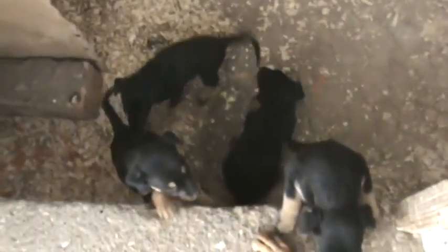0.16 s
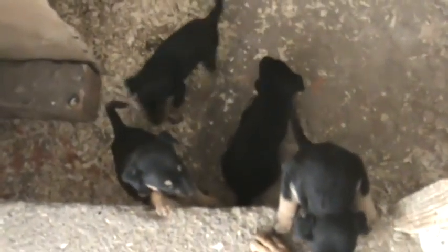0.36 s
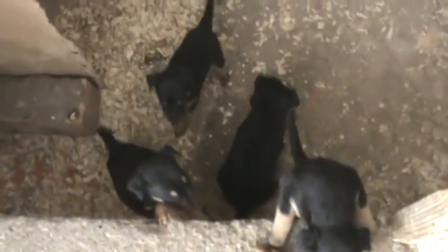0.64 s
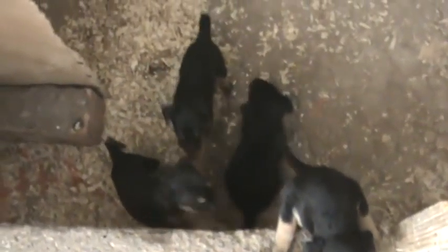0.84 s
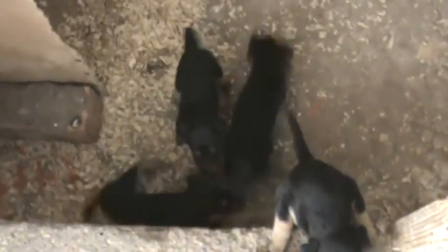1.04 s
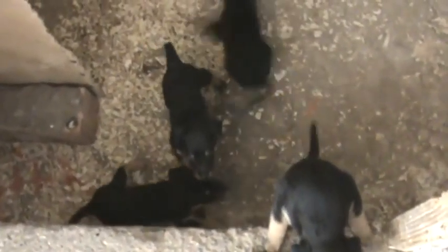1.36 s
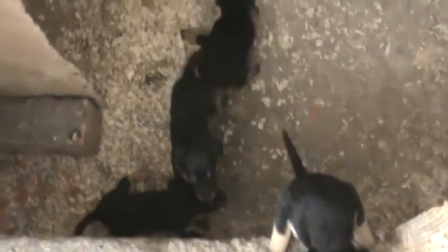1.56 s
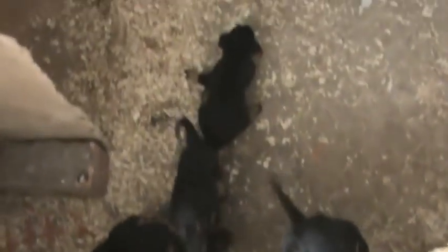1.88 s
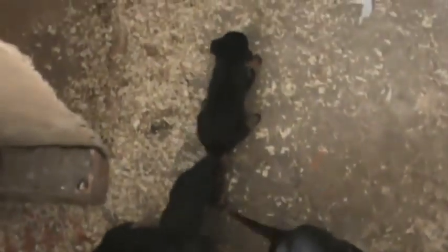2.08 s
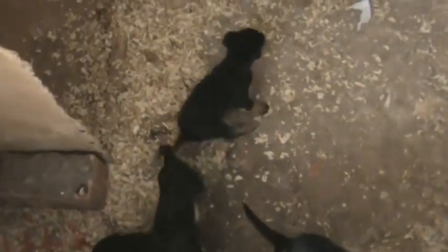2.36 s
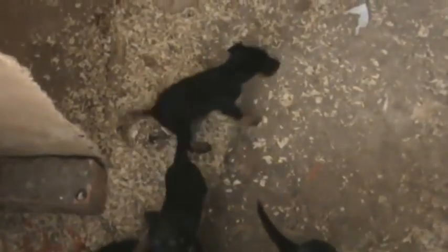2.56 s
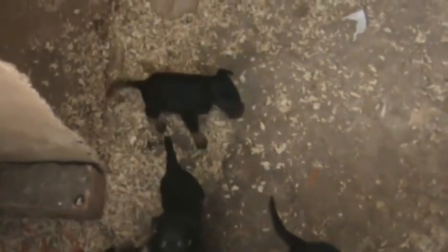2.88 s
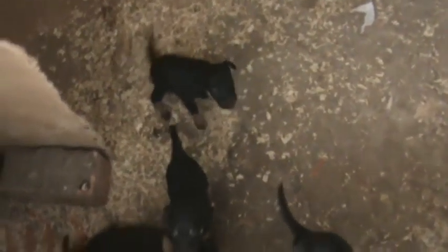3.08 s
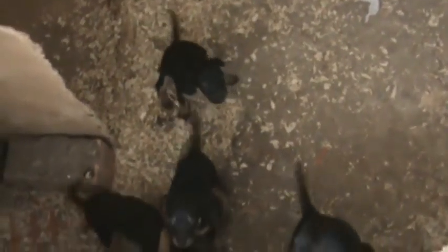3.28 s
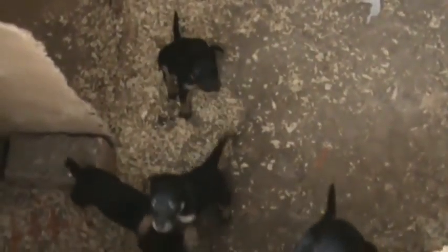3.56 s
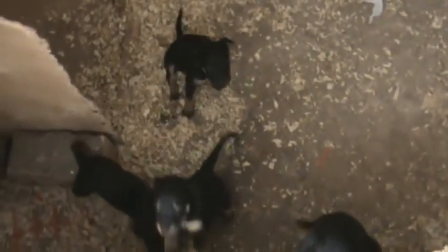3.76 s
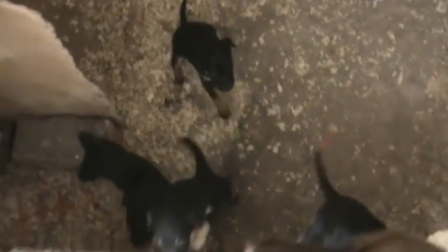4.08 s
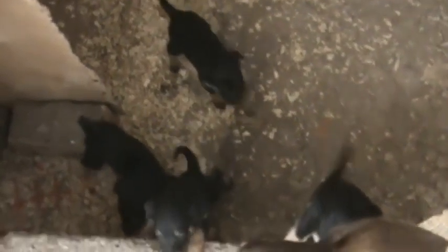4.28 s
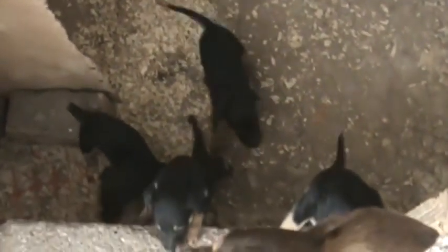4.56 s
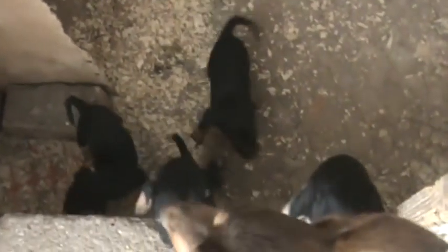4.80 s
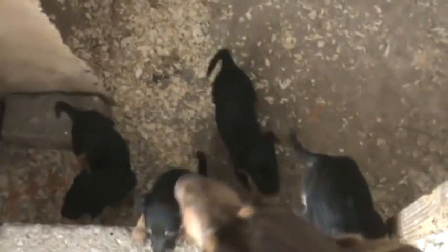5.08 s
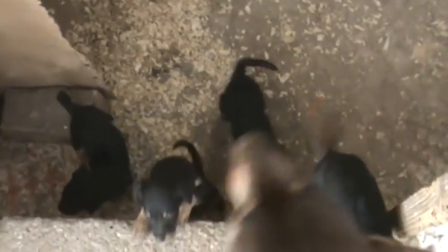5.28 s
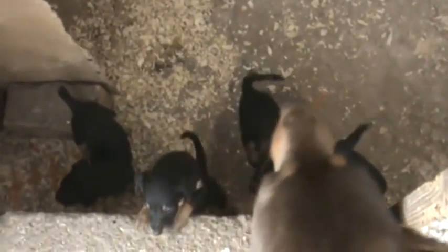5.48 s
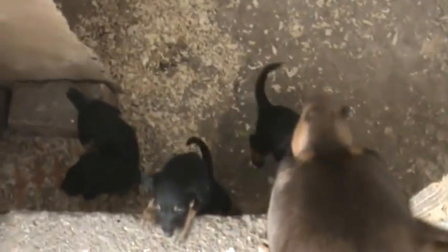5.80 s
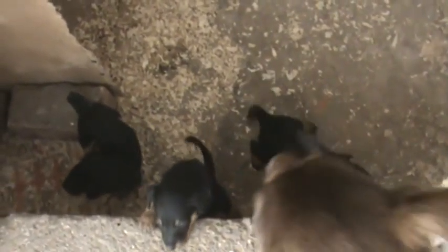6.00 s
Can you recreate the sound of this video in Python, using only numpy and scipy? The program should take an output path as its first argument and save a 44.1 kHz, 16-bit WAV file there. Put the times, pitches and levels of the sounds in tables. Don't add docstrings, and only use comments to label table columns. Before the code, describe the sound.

Close above a hard-walled pen, puppies call over low distant engine rumble, soft hiss and a barely audible thin electronic whine. A small yip opens, a falling yelp follows at 0.2 s, and a short bark at 0.7. From 1.0 to 2.3 s paws slip with brief rubbery squeaks, claws tick, a puff of breath passes, and faint groans, peeps and shavings rustle. At 2.35 s a loud, shrill yelp soars, ending near 2.5. Another cry at 2.7 becomes a piercing, held whine until about 3.0, with claws pattering beneath, then slides down and fades by 3.5. A softer wail rises at 3.7 and sinks to a rough groan around 4.4, where one sharp claw knock stands out. A distant dog moans very faintly. After 4.6 s only sparse light ticks, little grunts, a faint yip and soft breaths remain, to about 6.1 s.

```python
import sys
import numpy as np
from scipy import signal
from scipy.fft import rfft, irfft, next_fast_len
from scipy.io import wavfile
from scipy.ndimage import uniform_filter1d, minimum_filter1d, map_coordinates

SR = 44100
rng = np.random.default_rng(int(sys.argv[2]) if len(sys.argv) > 2 else 0)


def gain_from_db(level_db):
    decades = np.asarray(level_db, float) / 20
    return 10 ** decades


def master(y):
    cut = np.clip(np.atleast_2d(y).T, -1, 1)
    pcm = np.round(cut * 32767)
    wavfile.write(sys.argv[1], SR, pcm.astype(np.int16))


N = 270774
T = np.arange(N) / SR

# time in seconds, pitch in Hz, effort in dB, mouth opening in dB.
YELPS = [
    [(.217, 1114, -36.5, -2.5), (.228, 1144, -45.5, 18.5), (.245, 1329, -33, 12), (.268, 1417, -30.5, 8.5),
     (.29, 1377, -42, 12.5), (.31, 1073, -34, 4), (.34, 976, -33.5, -6), (.4, 911, -40.5, -12.5)],
    [(.708, 557, -38, 2.5), (.718, 544, -47, -1.5), (.725, 808, -28.5, -5.5), (.742, 801, -28.5, -9),
     (.757, 696, -33, -36)],
    [(2.022, 862, -45, -6), (2.045, 892, -43.5, -23), (2.07, 1122, -50.5, -1.5), (2.105, 1130, -48, -9)],
    [(2.35, 1377, -36.5, -1.5), (2.376, 1660, -14.5, -5.5), (2.388, 1738, -15, -10),
     (2.404, 1932, -22.5, 4.5), (2.428, 2116, -19.5, -6.5), (2.443, 2201, -14.5, -13),
     (2.462, 2214, -29, -10.5), (2.492, 2219, -13, -13.5), (2.512, 2205, -42.5, -6)],
]
WHINES = [
    [(2.726, 2020, -39, -8.5), (2.736, 1704, -29.5, -13.5), (2.754, 1657, -13.5, -8.5),
     (2.766, 1700, -18.5, -4.5), (2.786, 1830, -27, 2)],
    [(2.787, 2049, -24, -3), (2.82, 2227, -22.5, -0.5), (2.86, 2065, -11, -25.5), (2.89, 2084, -13, -17.5),
     (2.92, 2102, -13, -21.5), (2.955, 2097, -14.5, -16), (2.99, 2085, -11.5, -21),
     (3.006, 2040, -20, -10.5)],
    [(3.003, 2026, -17.5, -22), (3.025, 1954, -18, -19.5), (3.06, 1917, -25, -15), (3.12, 1871, -21.5, -18),
     (3.25, 1795, -40, 0), (3.3, 1704, -40.5, 3.5), (3.36, 1713, -36.5, -3.5), (3.41, 1597, -37.5, -2.5),
     (3.478, 1588, -41, -3.5)],
]
WAILS = [
    [(3.658, 1124, -45, -32), (3.68, 1304, -34.5, -18.5), (3.71, 1535, -29.5, -7.5),
     (3.745, 1689, -29.5, -12.5), (3.785, 1570, -56.5, -11)],
    [(3.782, 1548, -40.5, -9.5), (3.85, 1434, -40.5, -10.5), (3.96, 1553, -45, -4.5),
     (4.02, 1465, -39.5, -12), (4.12, 1364, -36.5, -15), (4.16, 1405, -40, -15), (4.29, 1342, -40, -12),
     (4.348, 1162, -44, -8.5), (4.41, 1059, -32.5, -25)],
]
GROANS = [
    [(1.355, 318, -47.5, -4), (1.375, 319.5, -46.5, 3), (1.395, 320.8, -41, -1.5),
     (1.418, 326.8, -36, -10.5), (1.455, 309.4, -51, -14.5)],
    [(4.407, 1034, -49, -4), (4.425, 859.7, -43.5, -13), (4.443, 735.5, -40, -8.5),
     (4.456, 846.7, -38, -22), (4.49, 749, -37, -22.5), (4.525, 714, -47, -17)],
]
SECOND_PARTIAL_GAINS = [
    [0, 0, 0, 0, 0, 0, 0, 0],
    [0, 0, 0, 0, 0],
    [0, 0, 0, 0],
    [-5, -2.5, -9, -3.5, 3, 7.5, 5.5, 5, -1.5],
    [9, 4, 2.5, 1.66, 1],
    [1.5, 1.8, 1.5, -1.5, 1.3, -1.5, 1.5, -1.5],
    [1.5, 1.5, -1.5, 1.5, -1.5, -1.46, 2.1, 1.4, 1.3],
    [0, 0, 0, 0, 0],
    [5, -6, 1, -3, -16, 14, 2.5, 3.5, -22],
    [7, 3, -5.5, -11, -8],
    [1.5, 1.3, 2.4, 1.5, 1.5, 1.5],
]
# nasal notch in Hz, mouth top in Hz, second partial in dB,
# its change in dB per dB of opening, roughness 0-1.
THROATS = [(2787, 5600, 13.5, 0.57, 0.08), (3540, 5250, -0.5, 1, 0.1), (3260, 7000, -5, -0.66, .22),
           (2930, 6030, 1.5, 1.16, 0.09), (2782, 6460, 11.5, 2.5, 0.09), (4670, 6250, 11, 1.14, 0.04),
           (4580, 6170, -10.5, 1.1, 0.03), (3135, 6600, 10.5, 1.1, 0.18), (2870, 7100, -12.5, -0.57, 0.05),
           (3060, 3800, 4, -0.3, 0.36), (3210, 3300, 12, 1.33, 0.3)]
# Hz, dB, Hz, dB.
CAVITIES = [(5660, 3.5, 4060, 4), (2360, 6.5, 5500, 0.5), (2680, 9, 4500, -3), (5000, -1, 11000, -14),
            (5000, 0, 6800, 6), (6400, -6, 8400, -2), (5700, -0.5, 7320, -6.5), (4760, -0.5, 6200, 3),
            (4200, -0.5, 8100, -3), (980, 9, 4500, 0), (2340, -12, 3500, 14)]
# start in seconds, length in seconds, first
# pitch in Hz, last pitch in Hz, effort in dB.
YIPS = [(0, 0.067, 946.5, 952, -46), (0.308, .135, 881, 725, -41), (2.09, 0.029, 370, 397, -54.5),
        (2.123, .05, 302.7, 281.6, -47), (2.513, 0.041, 2246, 2256, -31), (2.108, 0.034, 955, 874, -39),
        (2.495, 0.06, 1656, 1592, -30.5), (3.477, 0.023, 1406, 1407, -39.5), (3.568, 0.032, 1154, 890, -56),
        (4.487, 0.038, 481.5, 333, -50), (5.146, 0.024, 600, 640, -69), (5.155, 0.046, 908.5, 984, -51.5)]
# left minus right in dB, mouth opening in dB, second partial in dB, roughness 0-1.
YIP_THROATS = [(2.5, -15, 7.5, 0.6), (2, -22.5, -2, 0.3), (2.5, -15, -8, 0), (1, -11, -4.5, 0.6),
               (-0.5, -28.5, -10.5, 0.1), (-0.5, -22.5, 3.5, 0.3), (2.5, -33.5, -28, 0.4),
               (0, -22, -10, 0.49), (1, -18.5, -5.5, 1), (0, -16, -9, 0.3), (4, -2.5, 7, 0.9),
               (3.5, -20, -9, 0.39)]
# frequency in Hz, level in dB.
MOUTH = [(300, -22), (1000, -11), (2400, -3.5), (4400, -2.5), (5700, -2.5), (7000, 2), (9400, 10),
         (11700, 4.5), (16000, -10)]
# start in seconds, length in seconds, first slip rate in Hz, last rate in Hz, level in dB.
SQUEAKS = [(1.0266, .012, 2510, 2112, -27), (1.039, .05, 1973, 811, -34), (1.219, 0.022, 2890, 1009, -26.5),
           (1.527, 0.019, 1365, 892, -39.5), (1.546, 0.014, 1480, 744.5, -34),
           (1.998, 0.041, 1198, 1292, -48.5), (2.2659, .011, 906, 980, -29.5),
           (2.274, 0.017, 2596, 881, -28.5), (2.559, 0.032, 1244, 502.4, -32.5)]
# skin tone in dB, added unevenness 0-1.
GRIPS = [(-3, 0), (0, 0.5), (-4.5, .05), (-2, 0.07), (1.5, .2), (-2.5, 0), (-9.5, .3), (-23, 0.4), (-9, .5)]
# frequency in Hz, level in dB.
PAD = [(200, -14.5), (900, 7.5), (2500, 2), (4500, -4.5), (7000, -1), (9500, -9.5), (13000, -13),
       (16000, -32.5)]
# start in seconds,
# peak in dB, ring in Hz.
TICKS = [(1.0492, -25, 6400), (1.075, -20, 4340), (1.183, -38, 1450), (1.378, -28, 4270), (1.55, -35, 4860),
         (1.635, -19, 520), (1.997, -16.5, 5000), (2.027, -37, 2180), (2.348, -13, 1830), (2.412, -19, 900),
         (2.696, -24.5, 4200), (2.699, -26, 1000), (2.73, -18, 1900), (2.784, -20.5, 775),
         (2.808, -20, 2800), (2.827, -18.5, 600), (2.846, -23.5, 690), (2.862, -26.5, 600),
         (2.872, -24.5, 900), (2.893, -29, 2900), (2.904, -29, 2900), (3.279, -22, 2600), (3.41, -29, 3800),
         (3.66, -28, 900), (4.4345, -9, 1600), (4.9952, -30, 7500), (5.099, -32.5, 1485), (5.1, -42, 5450),
         (5.263, -36.5, 1700), (5.378, -37.5, 1590), (5.685, -34.5, 1636), (5.742, -40, 1610),
         (5.902, -32, 1590), (5.4077, -34, 3670), (5.626, -34.5, 906), (5.834, -27.5, 900)]
# start in seconds, peak in dB,
# pitch in Hz, overtones in dB.
GRUNTS = [(0.63, -46.5, 264, -22), (0.946, -43, 378, -30), (1.062, -32, 560, -9), (1.084, -33, 298.5, -38),
          (1.545, -40.5, 330, 1.5), (2.572, -39.5, 450, -12.5), (2.866, -47.5, 255, -0.5),
          (4.911, -38, 289, -6), (5.624, -40.5, 244, -6), (5.837, -41, 352, -11.5),
          (6.034, -41.5, 304, -11)]
# start in seconds, length in seconds, level in dB, centre in Hz, width in octaves.
RUSTLES = [(0.529, 0.029, -53, 7020, 0.53), (0.988, 0.037, -61, 4200, 0.15), (1.107, 0.038, -54, 5850, 1.2),
           (1.217, 0.055, -54, 4950, 1.4), (1.494, 0.089, -52.5, 6400, 1.9),
           (1.856, 0.3, -52.5, 5940, 0.67), (2.015, 0.28, -69, 6000, 0.36),
           (3.46, 0.048, -52.5, 6200, 0.57), (4.394, 0.13, -52, 7320, 0.27),
           (4.615, 0.08, -59.5, 5050, 0.98), (5.096, 0.037, -58.5, 7000, 0.65),
           (6.026, 0.086, -66.5, 8100, 0.87)]
# start in seconds, length in seconds, level in dB, centre in Hz, width in octaves.
PANTS = [
    (1.293, 0.18, -42, 6400, 0.86),
    (5.122, 0.24, -63.5, 5000, 0.28),
    (5.865, 0.16, -64, 5620, 0.29),
]
# start in seconds, length in seconds, first pitch in Hz,
# last pitch in Hz, level in dB.
MOANS = [(3.65, 0.41, 495, 504, -74), (3.87, 0.24, 178, 171, -69.5), (3.977, 0.18, 668, 782, -71),
         (3.996, 0.22, 551, 580, -66.5), (4.56, 0.12, 559, 505, -67), (4.72, 0.21, 533, 468, -65.5),
         (1.233, 0.034, 610, 680, -50.5), (1.384, 0.065, 433, 406, -50.5), (1.577, 0.068, 559, 562, -59.5),
         (4.853, 0.063, 1077, 1060, -65), (5.039, 0.032, 1414, 1415, -68)]
# frequency in Hz, time to fall 60 dB in seconds.
WALLS = [(200, 0.26), (800, 0.27), (2000, 0.32), (5000, 0.28), (12000, 0.28)]
# time in seconds, far engine in dB, hiss in dB.
FLOOR = [(0, -61.5, -64.5), (1.55, -68, -63), (1.75, -60, -66), (2.702, -62.5, -58.5), (2.851, -64.5, -74),
         (3.548, -68, -70.5), (3.75, -61, -69.5), (6.14, -62.5, -73)]
# frequency in Hz, level in dB per Hz.
RUMBLE = [(11, -34.5), (18, -4), (49, -8), (62, -7.5), (68, -14.5), (70, -29), (110, -31.5), (140, -55.5),
          (240, -120)]
# frequency in Hz, level in dB per Hz.
HISS = [(41, -32.5), (70, -8.5), (103, -12.5), (487, -13.5), (1060, -16.5), (1180, -19), (1630, -15),
        (2050, -19.5), (2400, -19), (4650, -21), (7020, -22.5), (15200, -32.5), (16300, -54.5)]
# frequency in Hz, left-right likeness.
ALIKE = [(60, 1), (290, 0.64), (900, 0.14), (3100, 0.3), (8000, 0.87), (15000, 0.66)]
# frequency in Hz, radians by which left leads.
PORTS = [(60, -0.081), (300, 0.34), (700, 1.2), (1100, 0.9), (2200, 0.49), (4600, 0.36), (6500, 0.45),
         (9000, -0.025), (13000, 1.2)]


def unit(x):
    return x / np.sqrt(np.mean(x ** 2) + 1e-20)


def along(points, hz):
    f, v = np.transpose(points)
    return np.interp(np.log(np.abs(hz) + 1), np.log(f + 1), v)


def bump(hz, centre_hz, octaves):
    return np.exp(-(np.log2(hz / centre_hz) / octaves) ** 2)


def wobble(n, rate):
    return map_coordinates(rng.standard_normal(int(n * rate / SR) + 4), [np.arange(n) * rate / SR])


def turning(hz):
    return 2 * np.pi * np.cumsum(hz) / SR


def filtered(x, response):
    m = next_fast_len(N + 8192)
    return irfft(rfft(x, m) * response(np.fft.rfftfreq(m, 1 / SR)), m)[..., :N]


def unpack(rows, fade):
    s, *cols = np.transpose(rows)
    i = max(round(s[0] * SR), 0)
    t = T[i:round(s[-1] * SR)]
    edge = np.clip(np.minimum(t - s[0], s[-1] - t) / fade, 0, 1)
    return i, edge, [np.interp(t, s, c) for c in cols]


def sides(pan_db):
    return gain_from_db(np.array([[pan_db / 2], [-pan_db / 2]]))


def calls():
    near_pan_db = 1
    shaped = zip(YELPS + WHINES + WAILS + GROANS, SECOND_PARTIAL_GAINS, THROATS, CAVITIES)
    out = [(np.column_stack([curve, gain]), near_pan_db, throat, cavities)
           for curve, gain, throat, cavities in shaped]
    for (s, length, first, last, db), (pan_db, open_db, second_db, rough) in zip(YIPS, YIP_THROATS):
        curve = []
        for u, loss_db in [(0, -1.5), (0.33, 0), (1, 13.5)]:
            curve.append((s + u * length, first + u * (last - first), db - loss_db, open_db, 0))
        top_hz = np.clip(6.7 * first, 2300, 6200)
        out.append((curve, pan_db, (2700, top_hz, second_db, 0, rough), (1, 0, 1, 0)))
    return out


def roughness(hz, rough):
    taut_hz = min(np.median(hz), 1060)
    after_peak = np.arange(len(hz)) > hz.argmax()
    rough = rough + 1.66 * np.maximum(1 - hz / taut_hz, 0) * after_peak
    return np.clip(rough * np.maximum(550 / hz, 1), 0, 1)


def upper_partials(hz, phase, bright_db, rough, throat, cavities):
    notch_hz, top_hz = throat[:2]
    low_hz, low_db, high_hz, high_db = cavities
    n, out = len(hz), 0
    sinus_db = np.minimum(bright_db, -40.5) - 25
    for k in range(3, 16):
        db = bright_db + along(MOUTH, k * hz) - 66 * np.log2(np.maximum(k * hz / top_hz, 1))
        db -= 24 * bump(k * hz, notch_hz, 0.29)
        db += low_db * bump(k * hz, low_hz, 0.11) + high_db * bump(k * hz, high_hz, 0.11)
        sway = gain_from_db((1 + 0.44 * k) * np.clip(wobble(n, 22.13), -2, 1))
        sway = sway + 3.3 * rough * wobble(n, .35 * hz.mean())
        sinus = (hz.mean() > 1662) * gain_from_db(sinus_db) * bump(k * hz, 11420, 0.1)
        trailing = np.cos(k * (phase - k * 0.12))
        out = out + (gain_from_db(db) + sinus) * sway * trailing * (k * hz < SR / 2)
    return out


def puppies():
    out, air = np.zeros((2, N)), np.zeros((2, N))
    for call, pan_db, throat, cavities in calls():
        notch_hz, _, second_db, follows, rough = throat
        i, edge, cols = unpack(call, fade=.003)
        n = len(edge)
        glide = max(150, round(0.06 * n))
        hz, first_db, open_db, gain_db = uniform_filter1d(cols, size=glide, mode="nearest")
        bright_db = first_db + open_db
        second_db = first_db + second_db + gain_db + follows * open_db
        second_db -= 10.5 * bump(2 * hz, notch_hz, 0.13)
        rough = roughness(hz, rough)
        unsteady = .35 * hz.mean()
        drift = (0.0022 + 0.017 * rough) * wobble(n, 70)
        jitter = 0.1084 * rough * wobble(n, unsteady)
        phase = turning(hz * (1 + drift + jitter))
        voice = -gain_from_db(first_db) * np.cos(phase) - gain_from_db(second_db) * np.cos(2 * phase - 4 * 0.12)
        voice *= 1 + 0.85 * rough * wobble(n, unsteady)
        voice *= gain_from_db(19 * np.minimum(rough, .25) * wobble(n, 95))
        voice -= upper_partials(hz, phase, bright_db, rough, throat, cavities)
        out[:, i:i + n] += sides(pan_db) * np.sqrt(2) * edge * voice
        puffs = (1 + np.sin(phase)) * rng.standard_normal(n)
        air[:, i:i + n] += sides(pan_db) * edge * rough * gain_from_db(bright_db + 14) * puffs

    def breath(f):
        notch = np.abs(1 - .8 * np.exp(-((f - 3300) / 400) ** 2))
        return gain_from_db(along(MOUTH, f)) * (f > 400) / (1 + (f / 6500) ** 6) * notch

    return filtered(out, lambda f: 1 / (1 + (270 / (f + 1)) ** 8)) + filtered(air, breath)


def pads():
    slips, tone = np.zeros(N), np.zeros(N)
    for (s, length, first, last, db), (tone_db, loose) in zip(SQUEAKS, GRIPS):
        i, edge, (t,) = unpack([(s, 0), (s + length, length)], fade=0.00071)
        n = len(t)
        hz = first * (last / first) ** (t / length) ** 1.25
        db = db - 19 * (t / .08) ** 1.2 - 8 * (t / length) ** 6
        uneven = .7 * np.clip(2 * (1 - hz / 2400) + 0.19 + loose, .1, 1)
        cycles = np.cumsum(hz * gain_from_db(2.5 * uneven * wobble(n, 1600))) / SR
        click = np.diff(np.floor(cycles), prepend=0) * np.sqrt(SR / hz)
        click = click * gain_from_db(3 * uneven * rng.standard_normal(n))
        grit = 0.5 * uneven * rng.standard_normal(n)
        slips[i:i + n] += edge * gain_from_db(db) * (click + grit)
        skin = np.sin(turning(hz * gain_from_db(0.29 * uneven * wobble(n, 400))))
        tone[i:i + n] += edge * gain_from_db(db + tone_db) * skin
    return filtered(slips, lambda f: 1j * gain_from_db(along(PAD, f) + 6.5) / (1 + (300 / (f + 1)) ** 4)) + tone


def claws():
    out, t = np.zeros(N + SR), np.arange(600) / SR
    for s, db, hz in TICKS:
        ring = np.sin(2 * np.pi * hz * t)
        crack = uniform_filter1d(rng.standard_normal(len(t)), size=max(1, int(SR / hz / 4)))
        out[round(s * SR):][:len(t)] += gain_from_db(db - 11.5 - 60 * t / 0.013) * (0.54 * ring + 0.35 * crack)
    return out[:N]


def grunts():
    out, length = np.zeros(N + SR), .04
    for s, db, hz, over_db in GRUNTS:
        t = np.arange(round(length * SR)) / SR
        phase = turning(hz * (1 + 0.11 * wobble(len(t), 253)))
        overtones = np.sin(3 * phase) + 1.1 * np.sin(2 * phase) + 0.49 * np.sin(6 * phase)
        tone = np.sin(phase) + gain_from_db(over_db) * overtones
        out[round(s * SR):][:len(t)] += gain_from_db(db - 14.5) * np.sin(np.pi * (t / length) ** 0.9) * tone
    return out[:N]


def grainy_bands(rows, sag):
    grains = rng.standard_normal((2, N)) * gain_from_db(2.39 * wobble(N, 590))
    grains[1] = 0.947 * grains[0] + 0.69 * grains[1]
    hz, t, z = signal.stft(grains, SR, nperseg=256)
    power = np.zeros(z.shape[1:])
    for s, length, db, first_hz, width in rows:
        u = np.clip((t - s) / length, 0, 1)
        band = bump(hz[:, None] + 1, first_hz * (1 - sag * u), width)
        power += gain_from_db(2 * db) * np.sin(np.pi * u) ** 1.5 * band / band.mean(0)
    return signal.istft(z * np.sqrt(power), SR, nperseg=256)[1][:, :N]


def shavings():
    return grainy_bands(RUSTLES, sag=0)


def pants():
    return grainy_bands(PANTS, sag=0.3)


def far_dog():
    out = np.zeros(N + SR)
    for s, length, first, last, db in MOANS:
        u = np.linspace(0, 1, round(length * SR))
        n = len(u)
        hz = (first + (last - first) * np.sin(np.pi * u / 2)) * (1 + 0.0233 * wobble(n, 89.7))
        swell = np.abs(np.sin(np.pi * u)) ** 0.18 * gain_from_db(db + 2.3 * wobble(n, 20.8))
        out[round(s * SR):][:n] += swell * np.sin(turning(hz))
    return out[:N]


def pen(x):
    noise = rng.standard_normal((2, SR * 3 // 4))
    noise[1] = 0.74 * noise[0] + 0.36 * noise[1]
    hz, t, z = signal.stft(noise, SR, nperseg=256)
    tail = signal.istft(z * gain_from_db(-60 * t / along(WALLS, hz)[:, None]), SR, nperseg=256)[1]
    late = np.pad(x, (400, 0))[None]
    return signal.fftconvolve(late, tail / np.linalg.norm(tail[0]), axes=1)[:, :N]


def rush(spectrum, alike, patchy_db):
    z = signal.stft(rng.standard_normal((2, N)), nperseg=512)[2]
    field = uniform_filter1d(rng.standard_normal(z.shape[1:]), size=6, axis=0)
    field = uniform_filter1d(field, size=12, axis=1)
    pair = signal.istft(z * gain_from_db(patchy_db * unit(field)), nperseg=512)[1][:, :N]

    def spread(hz):
        turn = np.arccos(np.clip(along(alike, hz), -1, 1)) / 2
        return gain_from_db(along(spectrum, hz)) * [np.cos(turn), np.sin(turn)]

    mid, side = filtered(pair, spread)
    return unit(np.array([mid + side, mid - side]))


def background():
    s, rumble_db, hiss_db = np.transpose(FLOOR)
    engine = gain_from_db(2.1 * wobble(N, 6.4)) * np.sin(turning(44 + 4.1 * wobble(N, 17)))
    traffic = rush(RUMBLE, [(30, 0.86), (90, .3)], patchy_db=3.5)
    rumble = gain_from_db(np.interp(T, s, rumble_db)) * (1.3 * engine + 0.81 * traffic)
    hiss_gain = gain_from_db(-59.5 + 0.81 * (np.interp(T, s, hiss_db) + 70.5))
    hiss = hiss_gain * rush(HISS, ALIKE, patchy_db=1.6)
    stutter = np.maximum(wobble(N, 70) - .6, 0)
    drive = gain_from_db(-61.5) * stutter * np.sin(2 * np.pi * 1630 * T)
    return rumble + hiss + drive


def scene():
    voices, paws, far = puppies(), pads() + claws(), far_dog() + grunts()
    direct = gain_from_db(1.5) * voices + sides(6) * paws + sides(0.91) * gain_from_db(6.5) * far + shavings() + pants()
    echo = pen(gain_from_db(-2.5) * voices.mean(0) + gain_from_db(-9) * paws + far)
    at_ports = filtered(direct + echo, lambda hz: np.exp(1j * along(PORTS, hz) * [[.5], [-.5]]))
    return at_ports + background()


def band_limit(x):
    return signal.sosfilt(signal.butter(12, 16470, fs=SR, output="sos"), x)


def record(dry):
    ports = filtered(dry, lambda hz: hz < 15950)
    peaks = -minimum_filter1d(-np.abs(ports).max(0), size=300)
    reach = uniform_filter1d(peaks, size=300)
    return band_limit(ports / (1 + (reach / 0.57) ** 4) ** 0.25)


dry = scene()
out = record(dry)
master(out)
```